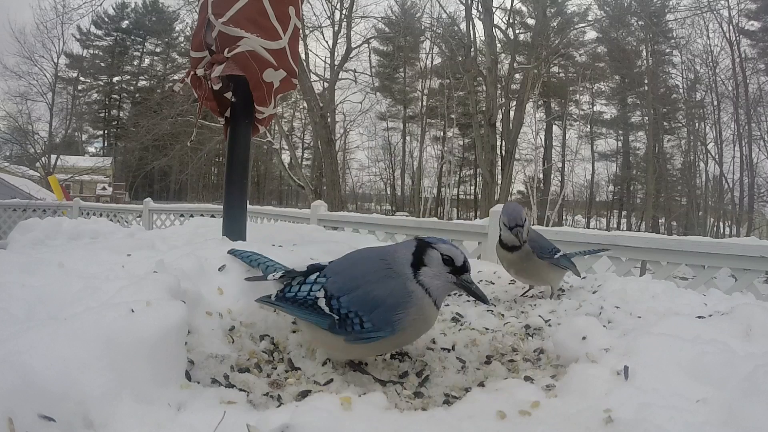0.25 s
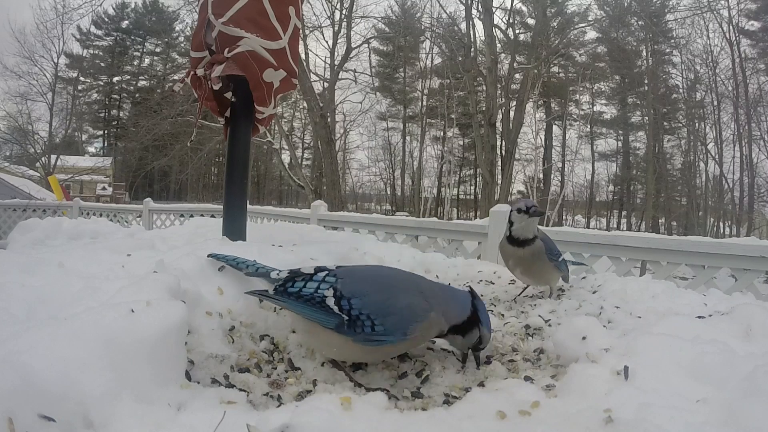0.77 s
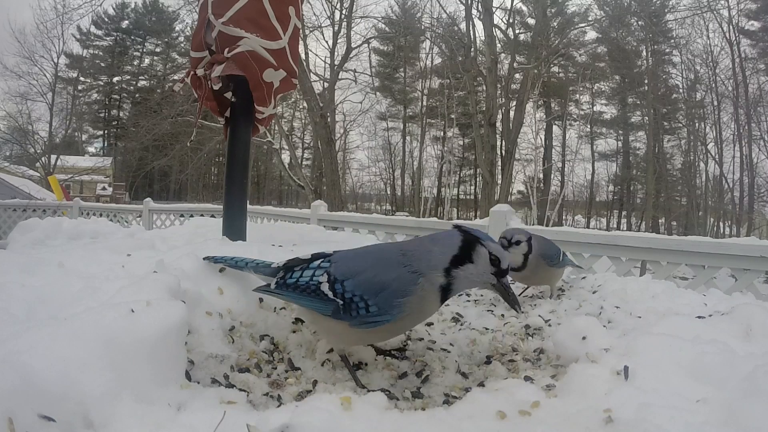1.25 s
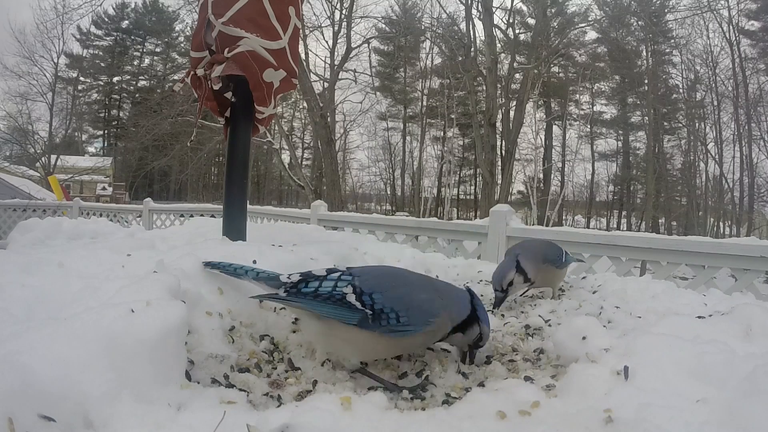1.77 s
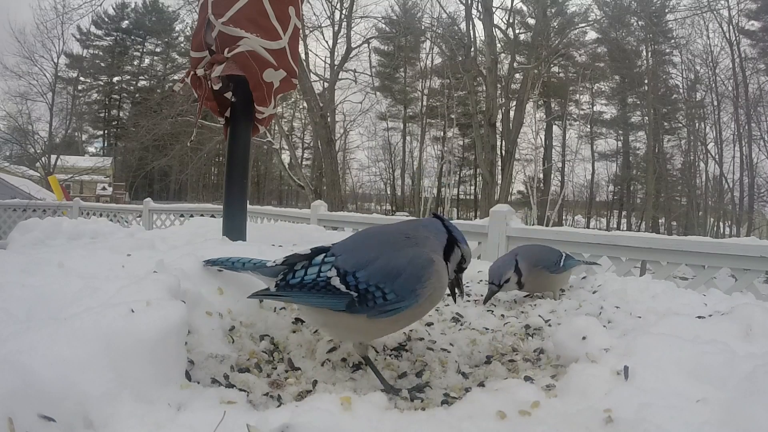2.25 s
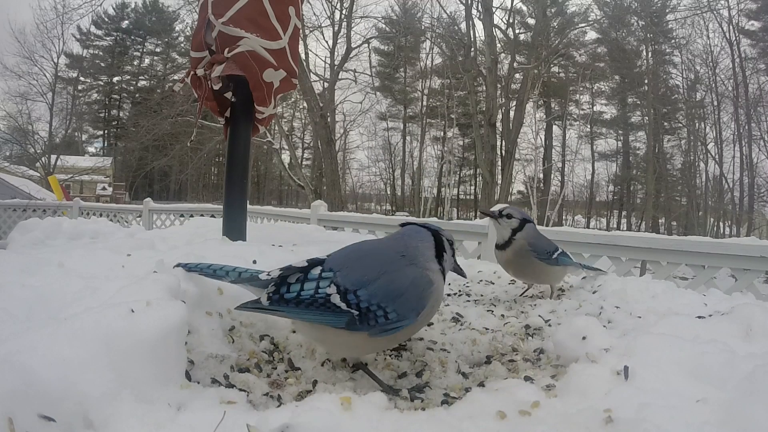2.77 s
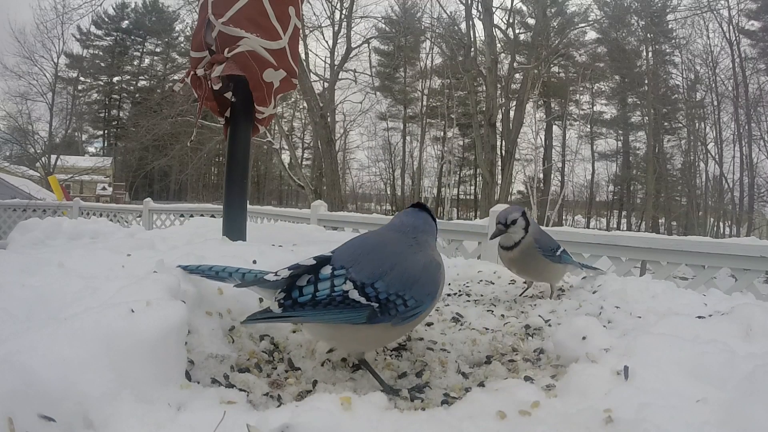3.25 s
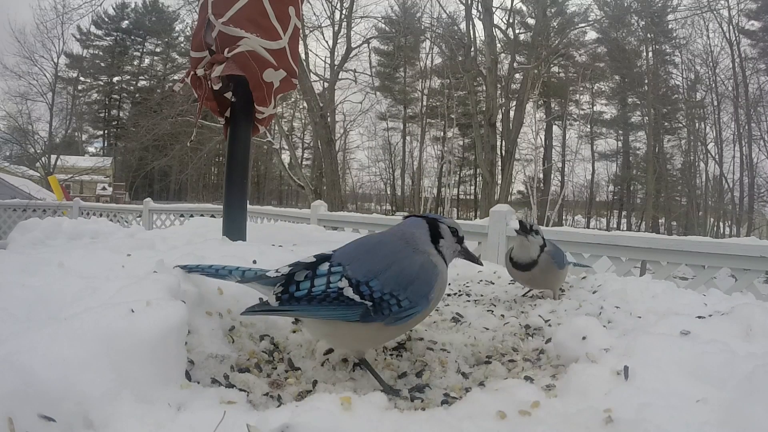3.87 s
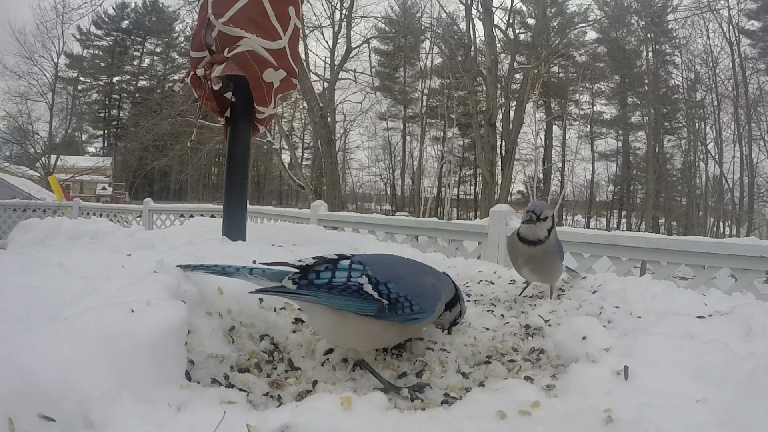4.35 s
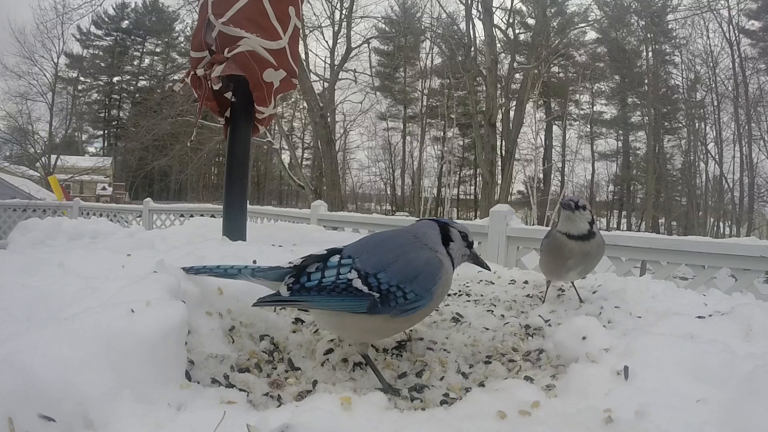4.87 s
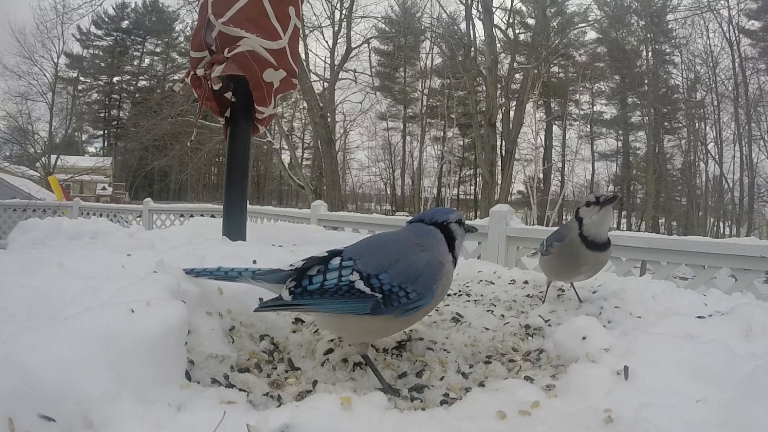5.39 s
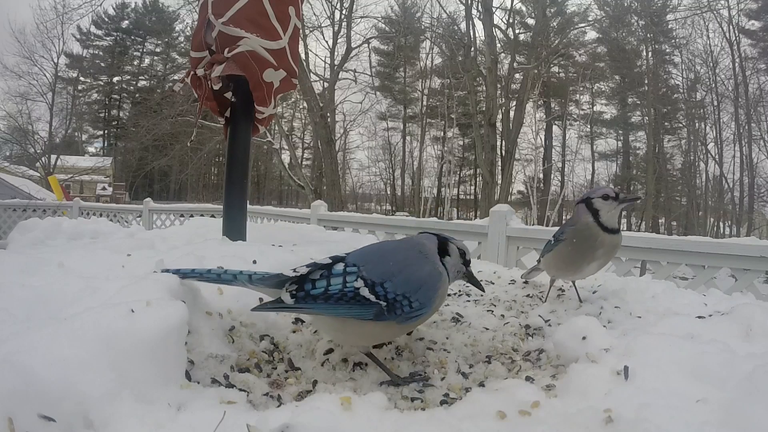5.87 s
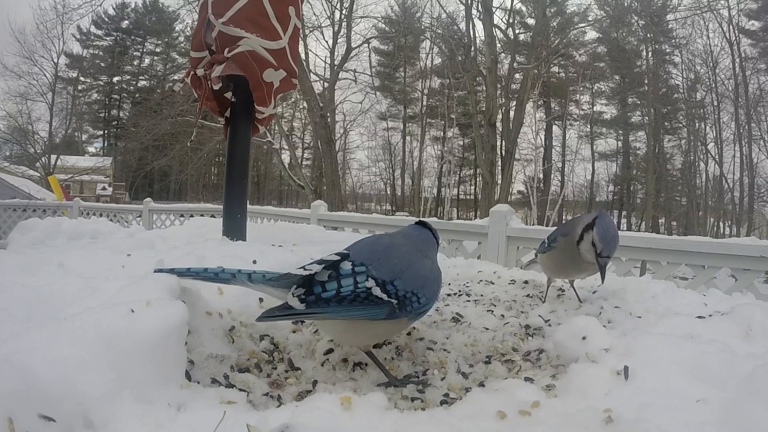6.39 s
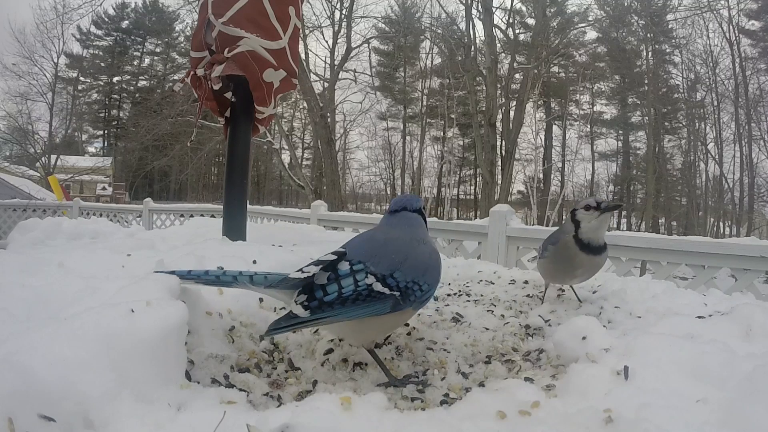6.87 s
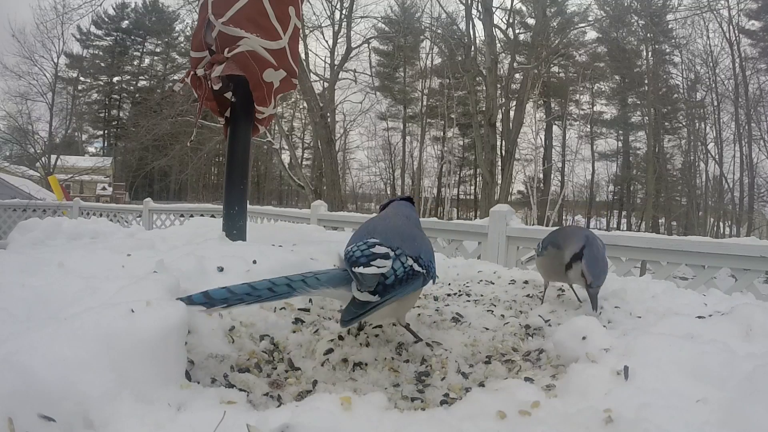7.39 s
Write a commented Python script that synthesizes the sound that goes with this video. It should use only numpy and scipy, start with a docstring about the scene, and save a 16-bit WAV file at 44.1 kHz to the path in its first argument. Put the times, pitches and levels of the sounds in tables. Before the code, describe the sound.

Very close to the microphone, jays peck at seed on a snow-covered board. Irregular dull thumps come with short crunches, dry rummaging and small clicks as kernels are grabbed and feet shift. Pecks cluster in the first two seconds, then come more sparsely. Behind is a quiet outdoor hush with faint electronic fizz and barely audible far bird calls.

```python
"""On a snowy feeding board that also carries the camera, jays peck at seed.
Each peck stabs the crust, thumps the board, rummages and grabs a kernel; feet shift, claws scuff, seeds click.
Pushes ring the board's low modes; clusters of noisy cracks, shaped by the camera housing, make the husks crunch.
Behind them lie shaped noise for winter air, wavering tones for far birds
and resonant noise for the faint, pulsing fizz of the camera's electronics."""
import sys
import numpy as np
from scipy import signal
from scipy.fft import rfft, irfft, next_fast_len
from scipy.io import wavfile
from scipy.ndimage import uniform_filter1d

SR = 44100
rng = np.random.default_rng(int(sys.argv[2]) if len(sys.argv) > 2 else 0)


def output_pcm(signal):
    """Save a mono or channel-first signal as 16-bit PCM at the path in sys.argv[1].

    Samples are clipped to [-1, 1] before scaling.
    """
    pcm = np.clip(np.atleast_2d(signal).T, -1, 1) * 32767
    wavfile.write(sys.argv[1], SR, np.round(pcm).astype(np.int16))


N = 336483  # length in samples


def amp(db):
    """Decibels to gain."""
    return 10 ** (np.asarray(db) / 20)


def unit(x):
    """Scale to rms 1."""
    return x / np.sqrt(np.mean(x ** 2) + 1e-20)


def bell(t, width):
    """A smooth Gaussian bump of height 1 around t = 0; width is its standard deviation."""
    return np.exp(-.5 * (t / width) ** 2)


def along(points, hz):
    """Read a curve of (Hz, value) points on a log frequency axis."""
    f, v = np.transpose(points)
    return np.interp(np.log(hz + 1), np.log(f + 1), v)


def filtered(x, response):
    """Shape x by a complex response of frequency."""
    m = next_fast_len(2 * len(x))
    spectrum = rfft(x, m) * response(np.fft.rfftfreq(m, 1 / SR))
    return irfft(spectrum, m)[:len(x)]


def resonances(modes, f):
    """Causal response of (Hz, width in Hz, dB) resonances of alternating sign."""
    total = 0
    for k, (center, width, db) in enumerate(modes):
        damping = 1j * f * width
        total = total + (-1) ** k * amp(db) * damping / (center * center - f * f + damping)
    return total


def add(track, sound, s):
    """Mix a sound into the track from s seconds on."""
    start = round(s * SR)
    part = sound[max(-start, 0):N - start]
    track[max(start, 0):][:len(part)] += part


# The colour of the air and hiss. Each row: frequency in Hz, relative level in dB.
AIR_COLOUR = [(12, -34), (20, -2.5), (32, -1.5), (82, -4), (108, -4), (222, -7), (309, -9), (365, -10),
              (443, -12), (670, -14.5), (2260, -22), (2600, -22.5), (5480, -30), (6650, -32.5),
              (14800, -45.5)]
AIR_DB = -56.5  # rms level


def winter_air():
    """Steady noise with most of its weight in the lows: an even, far hush with microphone hiss."""
    noise = rng.standard_normal(N)
    return amp(AIR_DB) * unit(filtered(noise, lambda f: amp(along(AIR_COLOUR, f))))


# Spells in which the fizz pulses. Each row: start in seconds, end in seconds.
FIZZ_SPELLS = [(.07, 2.0), (2.34, 2.95), (3.27, 5.2)]
# Resonances that colour the fizz. Each row: frequency in Hz, width in Hz, relative level in dB.
FIZZ_RESONANCES = [(3800, 130, 1), (6700, 340, 0.5), (9600, 380, -5.5), (11500, 320, -8.5)]


def electronics(pulse_db=-76.0, steady_db=-85):
    """Resonant noise fizzes faintly throughout and swells at an even beat during the spells."""
    period, width = .267, .017  # seconds
    t = np.arange(N) / SR
    beats = np.concatenate([np.arange(start, stop, period) for start, stop in FIZZ_SPELLS])
    swell = sum(bell(t - s, width) for s in beats)
    fizz = unit(filtered(rng.standard_normal(N), lambda f: resonances(FIZZ_RESONANCES, f)))
    return (amp(steady_db) + amp(pulse_db) * swell) * fizz


# One bird's short nasal note, repeated. Each row: centre in seconds, level in dB before the overtone mix.
FAR_NOTES = [(0.792, -74), (1.381, -73), (2.39, -72), (2.97, -76), (4.02, -74), (4.62, -69.5), (5.13, -73),
             (5.64, -75), (6.76, -72)]
# The note's overtones. Each row: multiple of the pitch, relative level in dB.
NOTE_OVERTONES = [(1, -1), (2, 5), (3, 1), (4, -6)]
# A small bird's thin whistles. Each row: centre in seconds, pitch in Hz, level in dB, half-length in seconds.
CHIRPS = [(5.42, 6850, -77, 0.023), (6.55, 6900, -73, 0.012)]


def far_birds(pitch_hz=1290, note_length=0.015):
    """Nasal notes built of overtones and thin sine whistles swell and fade softly, far off."""
    t = np.arange(N) / SR
    waver = .014  # rms share of the pitch
    drift = waver * unit(uniform_filter1d(rng.standard_normal(N), size=200))
    clock = t + np.cumsum(drift) / SR  # uneven time makes the pitch waver

    def tone(hz):
        """A sine on the uneven clock, so that its pitch wavers."""
        return np.sin(2 * np.pi * hz * clock)

    voice = sum(amp(db) * tone(round(k) * pitch_hz) for k, db in NOTE_OVERTONES)
    notes = voice * sum(amp(db) * bell(t - s, note_length) for s, db in FAR_NOTES)
    whistles = sum(amp(db) * bell(t - s, width) * tone(hz) for s, hz, db, width in CHIRPS)
    return notes + whistles


# A peck: the beak stabs through the crust, bottoms out on the board, rummages in the seed, grabs a kernel.
# Each row: start in seconds, stab in dB, stab rise in seconds, brightness in dB per octave,
# ring near 1.4 kHz in dB, surface knock in dB, push on the crust in dB, thump on the board in dB,
# softness (half-width of the push) in seconds, rummage in dB, delay of the grab in seconds, grab in dB.
# Stab, rummage, grab and knock are levels before the trims in seeds().
PECKS = [(0.0365, -46.5, .003, 8.5, -5, -49, -43, -27, 0.0013, -52, .1195, -46),
         (0.4957, -44.5, 0.0028, -1, -0.5, -66, -25.5, -27, 0.00094, -55, .0765, -48),
         (0.868, -44.5, 0.0016, 1.5, 1, -52, -33, -21.5, 0.0011, -57.5, 0.058, -54),
         (1.175, -45.5, 0.0009, -5.5, -4, -43.5, -38, -18, 0.0015, -67, .039, -39),
         (1.624, -46.5, 0.0024, -3, -1, -41.5, -58, -18.5, 0.001, -69, .049, -42.5),
         (1.8388, -29.5, 0.00045, -6, 2, -39.5, -44, -16, 0.0006, -59.5, .047, -48),
         (2.652, -57, 0.0038, 1, 3, -62, -64, -50, 0.0012, -60.5, 0.017, -61),
         (3.682, -47.5, 0.0033, 0, 3, -42, -37, -22, 0.001, -59, 0.072, -47.5),
         (4.215, -44, 0.0013, -4, -12, -34, -43, -17, 0.00095, -64, 0.052, -61),
         (4.419, -39, 0.0034, 6, 8.5, -51, -46, -27.5, 0.00083, -66, 0.088, -50.5),
         (5.756, -49, 0.0045, -0.5, 0, -39.5, -43, -24, 0.0011, -55.5, 0.054, -40.5),
         (6.192, -42, 0.0025, 3, 0, -37, -44, -18.5, 0.0011, -54, 0.047, -57),
         (7.2583, -46, 0.0015, 2, 3, -47.5, -41.5, -31.5, 0.00098, -62, 0.014, -59)]
# Feet land or shift on the board. Each row: time in seconds, force in dB, softness in seconds.
STEPS = [(.078, -49.5, 0.00048), (.125, -31, 0.0018), (.552, -33.5, .001), (4.499, -32, 0.0011),
         (4.66, -40, 0.00147), (7.267, -32, 0.0026)]
# The crust gives way, then the beak reaches the board, after so many rise times of the stab.
CRUST_RISES, SINK_RISES = 0.52, 2.23
GRAB_TUG_DB, TUG_SOFTNESS_S = 0, 0.00074  # the grab tugs the board: dB over the grab, seconds


def pushes():
    """All that shakes the board, as (s, force dB, softness s): the crust push, thump and tug, and the feet."""
    rows = list(STEPS)
    for s, _, rise, _, _, _, crust_db, thump_db, softness, _, grab_after, grab_db in PECKS:
        rows.append((s + CRUST_RISES * rise, crust_db, softness))
        rows.append((s + SINK_RISES * rise, thump_db, softness))
        rows.append((s + grab_after, grab_db + GRAB_TUG_DB, TUG_SOFTNESS_S))
    return rows


# Modes of the board. Each row: frequency in Hz, level in dB before scatter, time to fall 60 dB in seconds,
# direction of swing at the camera (+1 or -1).
BOARD_MODES = [(23.34, -21.5, 0.8, -1), (43.37, -16.5, 0.89, -1), (68.2, -6.5, 0.21, 1),
               (87.16, -11.5, 0.56, 1), (100.9, -15.5, 0.62, 1), (127.5, -9, 0.23, -1),
               (143.3, -1.46, 0.27, -1), (164, -11.5, 0.44, 1), (182.4, -10.5, 0.56, 1),
               (203.6, -4.5, 0.22, -1), (232.9, -6, 0.28, -1), (248.2, 1.3, 0.11, -1), (299.6, -5, 0.1, 1),
               (341, 7.5, 0.018, 1)]


def thumps(scatter_db=-0.87):
    """Each push rings the board's modes; a softer push misses the upper ones."""
    out, t = np.zeros(N), np.arange(SR) / SR
    lead = .01  # seconds from the start of the push to its peak
    hz, level, t60, swing = np.transpose(BOARD_MODES)
    decay = amp(level[:, None] - 60 * t / t60[:, None])
    modes = np.sign(swing)[:, None] * decay * np.sin(2 * np.pi * hz[:, None] * t)
    for s, db, softness in pushes():
        push = bell(t[t < 2 * lead] - lead, softness)
        # each push weights the modes afresh
        weights = amp(scatter_db * rng.standard_normal(len(BOARD_MODES)))
        ring = weights @ modes
        add(out, amp(db) * signal.fftconvolve(ring, push / push.sum()), s - lead)
    return out


def cracks(rise, grain=0.62, settle_db=-20, settle_time=0.025):
    """A cluster of tiny cracks flares up and dies away; the loosened husks go on rustling briefly."""
    t = np.arange(SR // 5) / SR
    bite = .0004  # seconds; the crust gives way gradually, even under the sharpest stab
    u = t / (rise + bite)
    flare = u * np.exp(1 - u)
    rustle = amp(settle_db) * (1 - np.exp(-u)) * np.exp(-t / settle_time)
    uneven = np.exp(grain * rng.standard_normal(len(t)))  # some cracks are much stronger than others
    return (flare + rustle) * rng.standard_normal(len(t)) * uneven


# Resonances of the camera mount and housing. Each row: frequency in Hz, width in Hz, relative level in dB.
HOUSING_RESONANCES = [(532, 30, -14), (890, 94, 1), (1048, 137, -3), (1333, 156, -1), (1530, 194, -6),
                      (2114, 380, 3), (2183, 460, 0)]


def housing(f, brightness, ring_db, edge_hz=2450, low_hz=470, airborne_db=-42):
    """Cracks arrive mostly through the housing; little of their treble comes by air."""
    octaves = np.log2(np.clip(f, 850, 2150) / 1400)  # the tilt levels off at both ends
    spot = amp(brightness * octaves + ring_db * bell(octaves, .18))
    wall = 1 / np.sqrt((1 + (f / edge_hz) ** 20) * (1 + (low_hz / (f + 1)) ** 6))
    air = amp(airborne_db) * f / (f + 1000) / np.hypot(1, (f / 4500) ** 2)
    return spot * resonances(HOUSING_RESONANCES, f) * wall + air


# Claws scuff the seed. Each row: start in seconds, level in dB before trim, rise in seconds.
SCUFFS = [(.128, -54.5, 0.01), (0.246, -58, 0.018), (4.488, -50, 0.0061), (7.237, -56.5, 0.0081)]
# Loose seeds click without ringing the board's modes.
# Each row: start in seconds, level in dB before trim, brightness in dB per octave.
CLICKS = [(.232, -40.5, 3), (.338, -56, 5), (3.834, -57, 1), (4.9045, -53.5, 8)]
# Brightness is in dB per octave, ring in dB near 1.4 kHz, knock in dB over its own crunch before the trims.
RUMMAGE_AFTER_S, RUMMAGE_RISE_S = .016, 0.019
RUMMAGE_BRIGHTNESS, RUMMAGE_RING_DB, RUMMAGE_KNOCK_DB = 1.7, 4.5, -3.5
GRAB_RISE_S, GRAB_KNOCK_DB = 0.0012, -7.5
GRAB_BRIGHTER, GRAB_RING_DB = 3.4, 3.5  # both over the stab
SCUFF_BRIGHTNESS, SCUFF_RING_DB, SCUFF_KNOCK_DB = 4.5, 3, -5.5
CLICK_RISE_S, CLICK_RING_DB, CLICK_KNOCK_DB = 0.0014, 7, -24


def crunches():
    """All that cracks, as (s, dB, rise s, brightness, ring dB, knock dB): stab, rummage, grab, claws, seeds."""
    rows = []
    for s, stab_db, rise, brightness, ring_db, knock_db, _, _, _, rummage_db, grab_after, grab_db in PECKS:
        rows.append((s, stab_db, rise, brightness, ring_db, knock_db))
        rows.append((s + RUMMAGE_AFTER_S, rummage_db, RUMMAGE_RISE_S,
                     RUMMAGE_BRIGHTNESS, RUMMAGE_RING_DB, rummage_db + RUMMAGE_KNOCK_DB))
        rows.append((s + grab_after, grab_db, GRAB_RISE_S,
                     brightness + GRAB_BRIGHTER, ring_db + GRAB_RING_DB, grab_db + GRAB_KNOCK_DB))
    for s, db, rise in SCUFFS:
        rows.append((s, db, rise, SCUFF_BRIGHTNESS, SCUFF_RING_DB, db + SCUFF_KNOCK_DB))
    for s, db, brightness in CLICKS:
        rows.append((s, db, CLICK_RISE_S, brightness, CLICK_RING_DB, db + CLICK_KNOCK_DB))
    return rows


# The hollow knock of the board's surface. Each row: frequency in Hz, width in Hz, relative level in dB.
SURFACE_RESONANCES = [(276, 83, 0), (372.5, 91, -1), (581, 47, -10)]


def seeds(crunch_trim_db=-0.67, knock_trim_db=2, knock_edge_hz=750):
    """Short stabs and longer scrapes crack the seed, each with a light knock on the surface below."""
    out = np.zeros(N)

    def surface(f):
        """The knock's resonances, muffled by snow."""
        return resonances(SURFACE_RESONANCES, f) / (1 + (f / knock_edge_hz) ** 6)

    def held(sound, length):
        """Scale the whole burst to the energy of rms 1 over so many samples."""
        return sound * np.sqrt(length) / np.linalg.norm(sound)

    for s, db, rise, brightness, ring_db, knock_db in crunches():
        length = (3 * rise + .004) * SR
        force = cracks(rise)
        crunch = filtered(force, lambda f: housing(f, brightness, ring_db))
        knock = filtered(force, surface)
        add(out, amp(db + crunch_trim_db) * held(crunch, length), s)
        add(out, amp(knock_db + knock_trim_db) * held(knock, length), s)
    return out


def scene():
    """Pecking close by, over the quiet of the yard."""
    background = winter_air() + electronics() + far_birds()
    pecking = thumps() + seeds()
    return (background + pecking)[None]


TOP_HZ = 15000


def record(dry):
    """The camera keeps nothing above its band limit."""
    return np.array([filtered(channel, lambda f: f < TOP_HZ) for channel in dry])


dry = scene()
out = record(dry)
output_pcm(out)
```